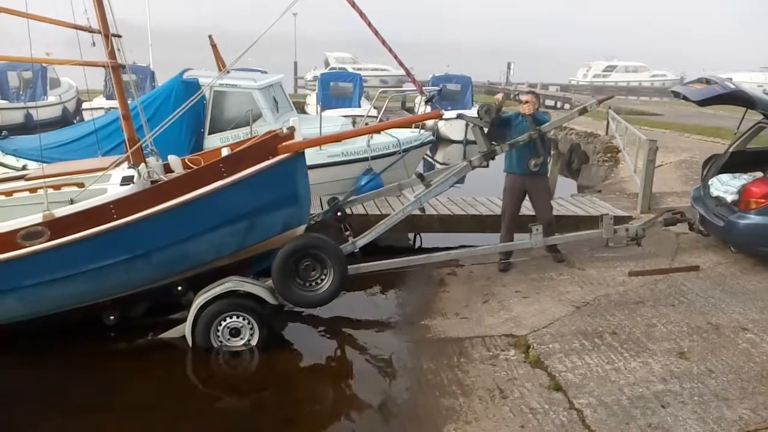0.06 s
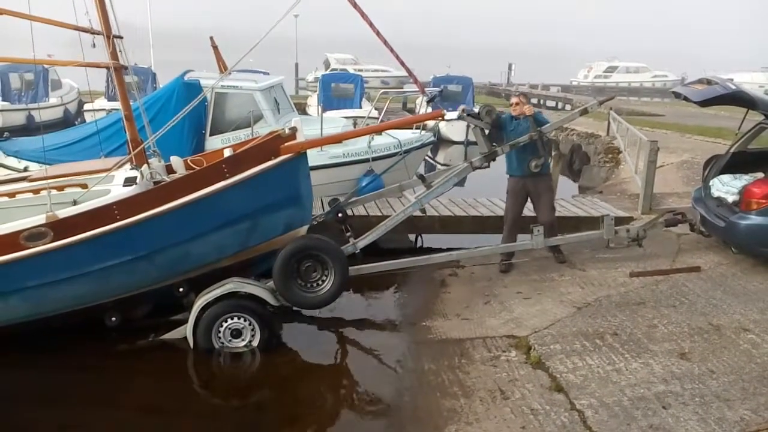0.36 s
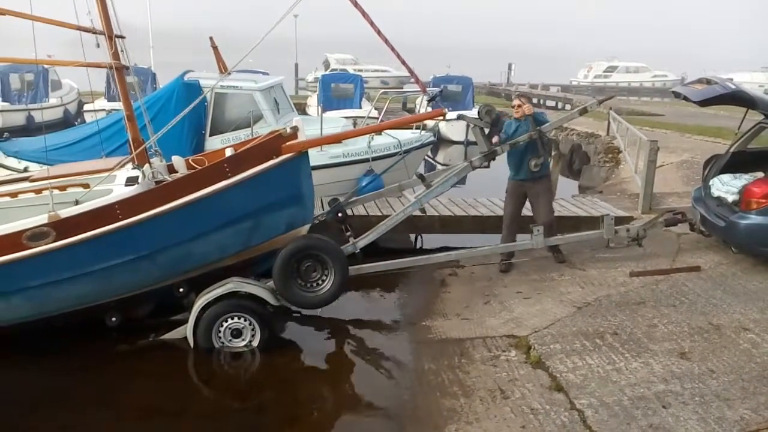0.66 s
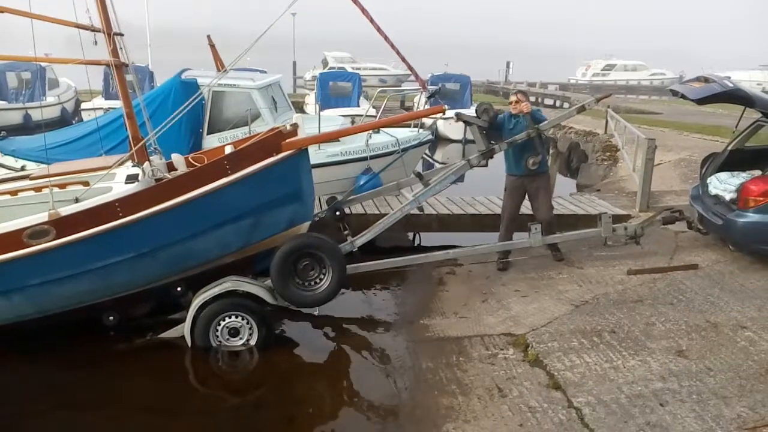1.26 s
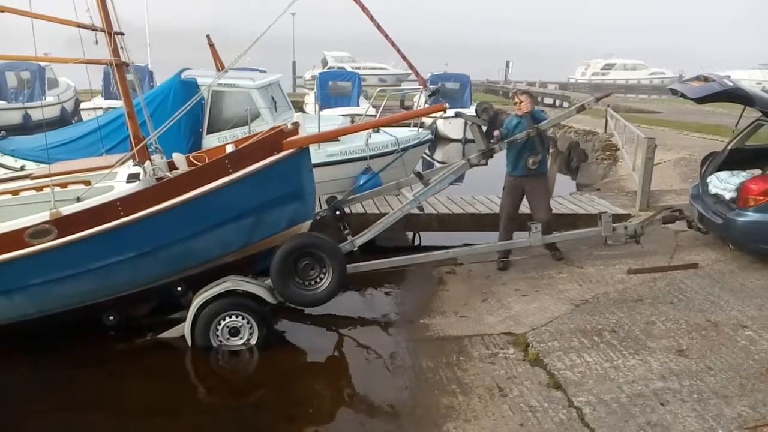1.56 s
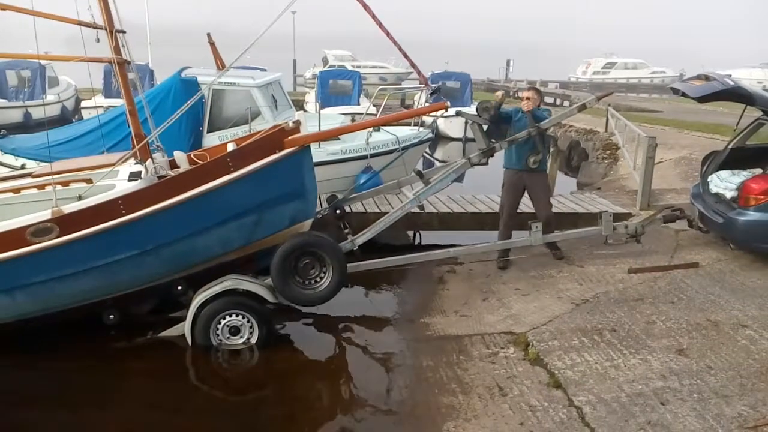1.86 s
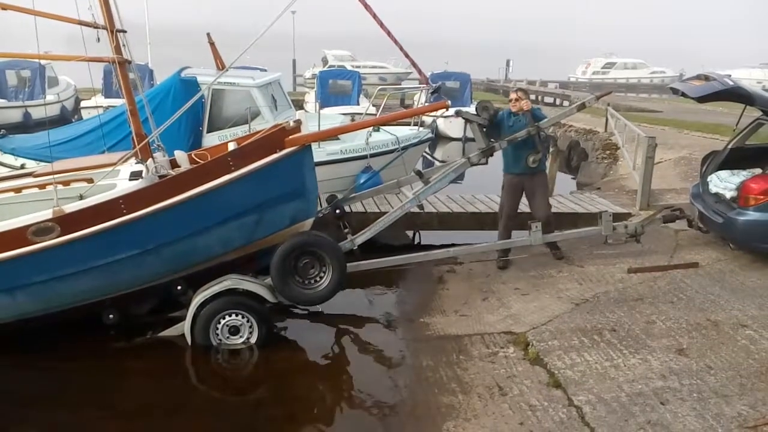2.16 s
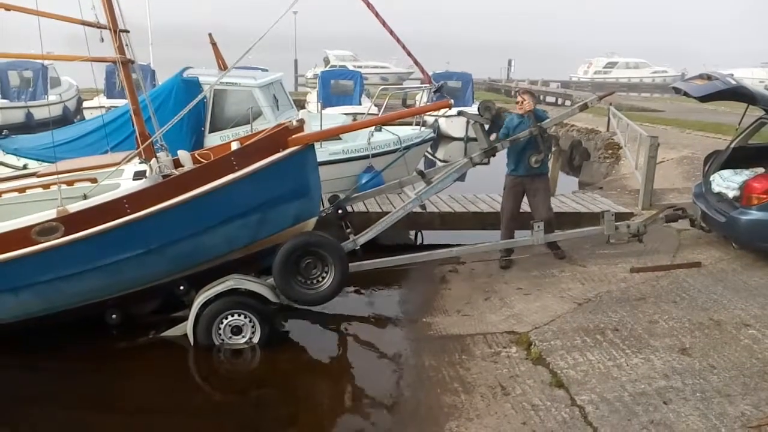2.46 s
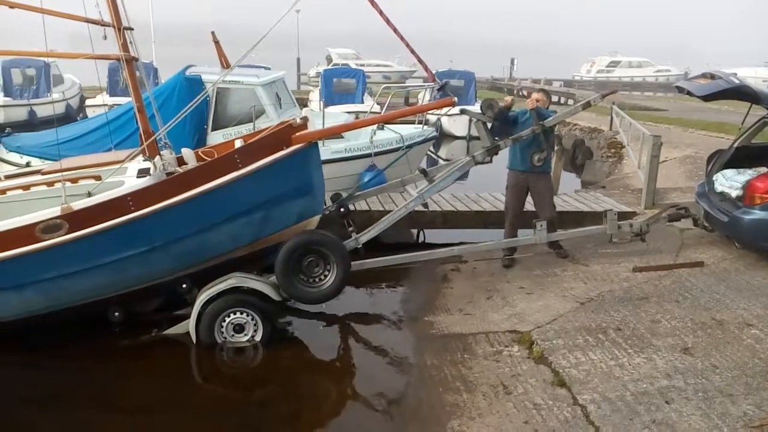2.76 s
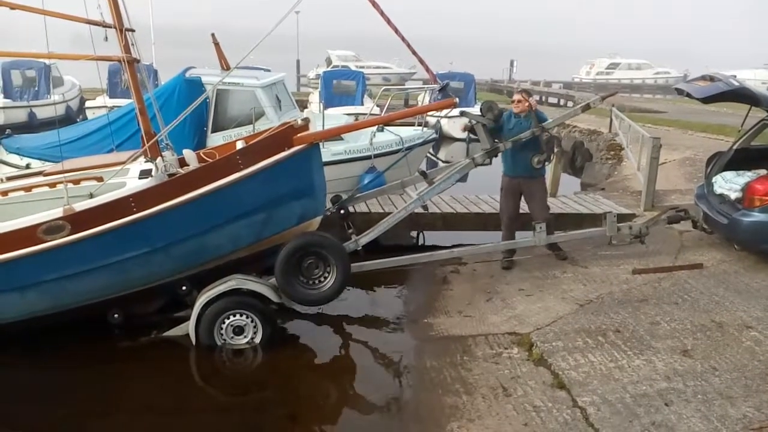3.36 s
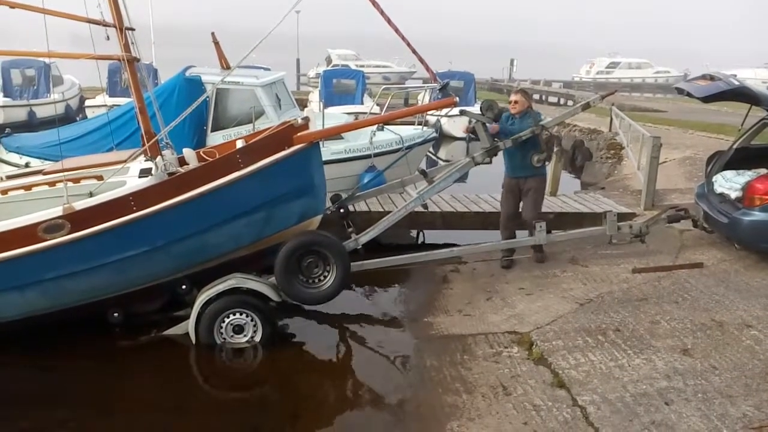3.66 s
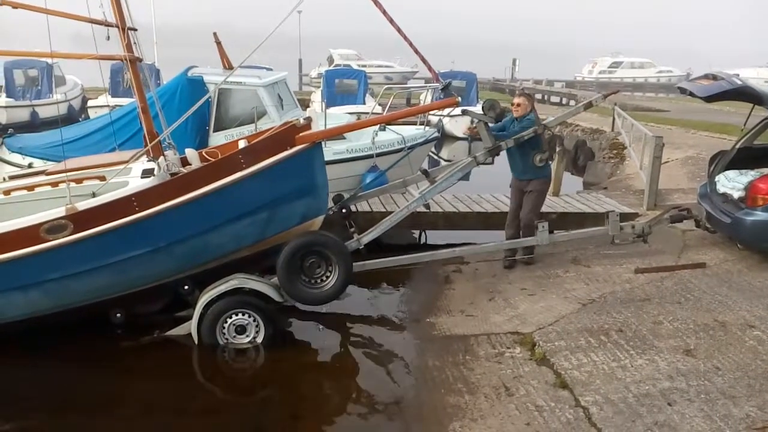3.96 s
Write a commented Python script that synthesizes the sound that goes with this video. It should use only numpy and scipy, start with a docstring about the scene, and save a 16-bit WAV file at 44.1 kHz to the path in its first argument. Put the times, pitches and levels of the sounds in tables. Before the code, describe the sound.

Bright steel ratchet clicks run quickly and unevenly from a hand-cranked trailer winch on an outdoor slipway. Faint grinding lies underneath and light wind brushes the microphone. A soft, dull knock comes shortly before the clicking slows and stops.

```python
"""An open slipway: a few metres away, a hand winch hauls a boat up its trailer.
The steel pawl clicks over the ratchet wheel, faster and slower with each turn of the crank, and stops
after a last slow tooth. Each click is a bright snap with the ring of pawl, housing and wheel, thrown
back by hulls and concrete. Underneath, gears grind, rollers rumble and the frame groans; the load
shifts with one dull knock, and a light wind brushes the microphone."""
import sys
import numpy as np
from scipy import signal
from scipy.fft import rfft, irfft
from scipy.io import wavfile
from scipy.ndimage import uniform_filter1d

SR = 44100
rng = np.random.default_rng(int(sys.argv[2]) if len(sys.argv) > 2 else 0)


def transcribe(u):
    """Save the signal u as a 16-bit wav file named by the first command-line argument.

    u: samples, shape (n,) or (channels, n), limited to [-1, 1]; the rate is SR.
    q: integer samples, one column per channel.
    """
    v = np.clip(np.atleast_2d(u).T, -1, 1)
    q = np.round(v * 32767).astype(np.int16)
    wavfile.write(sys.argv[1], SR, q)


N = 176400

# Steady harbour air. Each row: frequency in Hz, relative level in dB.
AIR_SPECTRUM = [(30, -19), (75, 11), (130, -7.5), (400, 1), (800, -8.5), (1600, -8), (2200, -13),
                (4800, -14), (5600, -6.5), (7500, -26), (15500, -23)]
# Low buffeting of the wind. Each row: frequency in Hz, relative level in dB.
WIND_SPECTRUM = [(20, 0), (50, -31), (75, 11.5), (100, 1), (160, 0.5), (450, -13), (700, -61)]
# Rise and fall of the gusts. Each row: time in seconds, level in dB.
GUST_LEVEL = [(0, -67), (.17, -61.5), (.33, -67.5), (.68, -67), (1, -70), (1.38, -60.5), (1.6, -59),
              (1.85, -73), (2.62, -67.5), (2.85, -74), (3, -68.5), (3.6, -74.5)]
# Grind of the gears. Each row: frequency in Hz, relative level in dB.
GEAR_SPECTRUM = [(480, -14), (800, -9), (1050, -1.5), (1250, -3), (3600, -3.5), (6000, -6.5), (12000, -49)]
# Rumble of the rollers under the hull. Each row: frequency in Hz, relative level in dB.
ROLLER_SPECTRUM = [(90, -5), (150, 1), (330, 3.5), (520, 1), (3000, -83)]
# Groans of the trailer frame. Each row: peak time in seconds, pitch in Hz, level in dB.
FRAME_GROANS = [(.19, 605, -65.5), (.73, 604, -63), (.8, 272, -66), (.96, 586, -69), (1.57, 627, -68.5),
                (1.91, 610, -72), (2.2, 390, -68.5), (2.731, 582, -66), (3.049, 615, -65.5)]
# Resonances of the knock. Each row: start in seconds, pitch in Hz, width in Hz, seconds to fade
# by 60 dB, level in dB.
KNOCK_BANDS = [(3.192, 644, 174, 0.53, -57.5), (3.192, 950, 300, 0.26, -58), (3.21, 229, 100, 0.18, -49.5)]
# Teeth passing under the pawl. Each row: start in seconds, relative level of the ping in dB.
TOOTH_CLICKS = [(0.038, -36), (0.1048, -32), (0.1646, -36.5), (0.2218, -34.5), (0.2764, -37),
                (0.326, -37.5), (0.369, -38.5), (0.406, -34.5), (0.4433, -30.5), (0.4771, -52),
                (0.508, -31), (0.5353, -31), (0.5626, -33), (0.5892, -35), (0.618, -29.5), (0.6456, -34),
                (0.675, -37), (0.7035, -32), (0.7329, -33), (0.762, -38), (0.7935, -36), (0.829, -32.5),
                (0.8685, -34.5), (0.908, -37), (0.9481, -33), (0.9989, -37.5), (1.0537, -35.5),
                (1.1003, -33), (1.14, -34.5), (1.1781, -32.5), (1.2138, -38), (1.2448, -35.5), (1.276, -38),
                (1.3084, -34), (1.3388, -33), (1.3674, -33), (1.394, -32), (1.4199, -33.5), (1.4498, -33.5),
                (1.4795, -35.5), (1.5089, -34), (1.5396, -34.5), (1.5709, -33.5), (1.6013, -34),
                (1.6324, -34), (1.6617, -34.5), (1.698, -33.5), (1.738, -35.5), (1.7756, -36),
                (1.8171, -36), (1.8787, -36), (1.941, -34), (1.987, -32), (2.0285, -36.5), (2.068, -36.5),
                (2.1038, -30), (2.1398, -33.5), (2.1712, -36), (2.2072, -37), (2.2388, -36), (2.2706, -36),
                (2.3022, -30.5), (2.3359, -36), (2.3696, -35.5), (2.404, -35.5), (2.4363, -35), (2.47, -32),
                (2.504, -38), (2.5386, -34), (2.574, -33), (2.6111, -32.5), (2.6544, -37.5),
                (2.6983, -38.5), (2.739, -37), (2.7801, -39), (2.8421, -42), (2.9033, -35.5), (2.9577, -37),
                (3.0065, -35.5), (3.059, -36.5), (3.1051, -34.5), (3.149, -35.5), (3.1949, -39),
                (3.2403, -40), (3.282, -47), (3.3222, -38), (3.3639, -35), (3.4136, -44), (3.4695, -40.5),
                (3.5665, -60)]
# The pawl slips off, chatters and lands within a click. Each row: delay in ms, relative level in dB.
PAWL_CONTACTS = [(.1, -5), (.8, -4.5), (1.9, -10.5), (3.3, -4.5), (4, -1.5), (5.7, -5.5), (7.2, -16.5)]
# Bright ping of the pawl. Each row: pitch in Hz, relative level in dB.
PAWL_MODES = [(5630, -19), (6110, -7), (6185, -15), (6575, -14), (6960, -66.5), (7470, -41), (8090, -35)]
# Ring of the housing. Each row: pitch in Hz, relative level in dB.
HOUSING_MODES = [(1050, -70), (1610, -59.5), (1730, -57), (2340, -58), (3020, -60), (3700, -58.5),
                 (3920, -59.5), (4450, -71.5), (5270, -62.5), (5800, -44.5), (5930, -54)]
# Clack of the ratchet wheel. Each row: pitch in Hz, relative level in dB.
WHEEL_MODES = [(1915, 1), (2030, -8)]
# Weight of that clack through the haul. Each row: time in seconds, relative level in dB.
WHEEL_LEVEL = [(0, -44.5), (.3, -46.5), (.38, -43), (.67, -45.5), (.85, -42), (1.03, -45.5), (1.15, -41.5),
               (1.42, -50.5), (2.4, -48.5), (3.13, -42.5), (3.45, -47.5), (3.57, -55)]
# Broad snap of steel on steel. Each row: frequency in Hz, relative level in dB.
SNAP_SPECTRUM = [(800, -17), (1400, -13), (2600, 2), (3250, -1.5), (5500, 12), (6300, 12.5), (6900, 7.5),
                 (7700, -4), (8600, -52), (10000, -24.5), (12000, -33.5)]
# High glints on top of the snap. Each row: centre in Hz, width in Hz, relative level in dB.
GLINT_BANDS = [(14100, 370, 4.5), (15700, 240, -12), (14000, 230, -12), (11240, 180, 14)]
# Strength of the glints through the haul. Each row: time in seconds, relative level in dB.
GLINT_LEVEL = [(0, -82), (.28, -84), (.42, -75), (1, -81), (1.35, -75), (1.85, -78), (3.15, -70),
               (3.57, -74)]

TYPICAL_TEETH_PER_S, TYPICAL_PING_DB = 25, -34
SNAP_FOLLOW, HOUSING_FOLLOW = 0.05, 0.32  # dB gained for each dB of extra ping
SCATTER_DB, SCATTER_RISE_S, SCATTER_T60_S, SCATTER_KEPT = 7, 0.0046, 0.031, 0.58
CLACK_DELAY_S, CLACK_RISE_S = 0.000775, 0.0024


def amp(db):
    """Decibels to gain."""
    return 10 ** (np.asarray(db) / 20)


def unit_rms(x):
    """Scales to an rms of 1."""
    return x / np.sqrt(np.mean(x ** 2) + 1e-20)


def unit_energy(x):
    """Scales to an energy of 1."""
    return x / (np.linalg.norm(x) + 1e-20)


def eq_curve(points, hz):
    """Gain of a spectrum table at these frequencies."""
    f, db = np.transpose(points)
    return amp(np.interp(np.log(hz + 1), np.log(f), db))


def fader(points, s):
    """Gain of a level curve at these times."""
    return amp(np.interp(s, *np.transpose(points)))


def peaks(bands, hz):
    """Gain of a set of resonances."""
    return sum(amp(db) / (1 + (2 * (hz - f) / width) ** 2) for f, width, db in bands)


def add(mix, start_s, sound):
    """Mixes a sound in at a time."""
    part = mix[max(round(start_s * SR), 0):][:len(sound)]
    part += sound[:len(part)]


def minimum_phase(gain):
    """Spectrum of a sharp-edged ring with this tone colour."""
    log = np.log(np.maximum(gain, 1e-5))
    mirrored = np.r_[log, log[-2:0:-1]]
    return np.exp(np.conj(signal.hilbert(mirrored)))[:len(gain)]


def noise(gain):
    """Coloured noise of rms 1."""
    return unit_rms(irfft(rfft(rng.standard_normal(N)) * gain, N))


def flutter(hz, depth_db, smooth_s=0.026):
    """Uneven gain of sticking and slipping."""
    wobble = noise(np.exp(-(hz * smooth_s) ** 2))
    return unit_rms(amp(depth_db * wobble))


def crank_speed(s):
    """Pace of the winch from the spacing of the clicks; 1 is its usual pace."""
    times = np.transpose(TOOTH_CLICKS)[0]
    return np.interp(s, times, 1 / np.gradient(times)) / TYPICAL_TEETH_PER_S


def air_and_wind(t, hz, air_db=-72.5):
    """Light, low gusts on the microphone over a steady bed of harbour air."""
    rolloff = 1 + (hz / WIND_SPECTRUM[-1][0]) ** 2
    gusts = fader(GUST_LEVEL, t) * noise(eq_curve(WIND_SPECTRUM, hz) / rolloff)
    return gusts + amp(air_db) * noise(eq_curve(AIR_SPECTRUM, hz))


def slipway_reflections(dry, predelay_s=0.0065, near_t60_s=0.11, far_t60_s=0.37, far_top_hz=7100):
    """Adds quick reflections from hulls and concrete, and a faint, duller far tail."""
    t = np.arange(SR // 2) / SR
    near, far = rng.standard_normal((2, len(t))) * (t > predelay_s)
    far = signal.sosfilt(signal.butter(2, far_top_hz, fs=SR, output="sos"), far)
    near = amp(-10.5) * unit_energy(near * amp(-60 * t / near_t60_s))
    far = amp(-22) * unit_energy(far * amp(-60 * t / far_t60_s))
    return dry + signal.fftconvolve(dry, near + far)[:N]


def frame_groans(t, hz, swell_s=0.11, width_hz=100):
    """The trailer frame groans in short swells of narrow-band noise."""
    groans = np.zeros(N)
    for peak_s, pitch, db in FRAME_GROANS:
        swell = np.exp(-((t - peak_s) / swell_s) ** 2)
        groans += amp(db) * swell * noise(peaks([(pitch, width_hz, 0)], hz))
    return groans * flutter(hz, depth_db=0.5)


def gears_and_rollers(t, hz, stop_s=0.093, rise_db_per_s=0.3):
    """Gears grind and rollers rumble, louder as the crank speeds up, dying after the last tooth."""
    since_last_tooth = np.maximum(t - TOOTH_CLICKS[-1][0], 0)
    speed = crank_speed(t) * np.exp(-since_last_tooth / stop_s)
    grind = amp(-62 + rise_db_per_s * t) * speed * noise(eq_curve(GEAR_SPECTRUM, hz))
    rumble = amp(-76) * speed ** 2.15 * noise(eq_curve(ROLLER_SPECTRUM, hz))
    return grind + rumble * flutter(hz, depth_db=6.5)


def load_knock(t, hz):
    """One dull, rough knock as the load shifts; each resonance swells over two cycles."""
    out = np.zeros(N)
    for start_s, pitch, width, t60, db in KNOCK_BANDS:
        attack = 1 - np.exp(-(t * pitch / 2) ** 2)
        add(out, start_s, attack * amp(db - 60 * t / t60) * noise(peaks([(pitch, width, 0)], hz)))
    return out


def frame_ring(clicks, pitch_hz=1747, t60_s=0.96, send_db=-33.5):
    """The trailer frame rings on faintly after the clicks."""
    t = np.arange(SR) / SR
    tone = unit_energy(np.sin(2 * np.pi * pitch_hz * t) * amp(-60 * t / t60_s))
    return amp(send_db) * signal.fftconvolve(clicks, tone)[:N]


def steel_ring(drive, hz, modes, width_hz, skirt_hz=626, detune=0.0043, spread_db=2.5):
    """Struck steel rings in its modes, their pitch and level a little different on every tooth."""
    out = 0
    for pitch, db in modes:
        offset = 2j * (hz - pitch * (1 + detune * rng.standard_normal()))
        mode = irfft(drive / (1 + offset / width_hz) / (1 + offset / skirt_hz))
        out = out + amp(db + spread_db * rng.standard_normal()) * unit_energy(mode)
    return out


def steel_snap(drive, hz, start_s, accent_db, glint_spread_db=2):
    """Steel hits steel: a broad snap, harder at speed, topped with flickering glints."""
    strength = amp(-41.5 + SNAP_FOLLOW * accent_db) * crank_speed(start_s) ** 0.36
    body = strength * unit_energy(eq_curve(SNAP_SPECTRUM, hz))
    bands = [(f, width, db + glint_spread_db * rng.standard_normal()) for f, width, db in GLINT_BANDS]
    glints = fader(GLINT_LEVEL, start_s) * unit_energy(peaks(bands, hz))
    colour = np.hypot(body, glints)
    snap = irfft(drive * minimum_phase(colour / colour.max()))
    return np.linalg.norm(colour) * unit_energy(snap)


def pawl_chatter(hz, drift_ms=0.083, jitter_ms=0.013, spread_db=5.5):
    """Yields each tooth's burst of contacts as a spectrum; timing drifts and force varies."""
    delay_ms, contact_db = np.transpose(PAWL_CONTACTS)
    drift, jitter, forces = rng.standard_normal((3, len(TOOTH_CLICKS), len(PAWL_CONTACTS)))
    drift = unit_rms(uniform_filter1d(drift, size=9, axis=0))  # smoothed over nine teeth
    delays_s = np.maximum(delay_ms + drift_ms * drift + jitter_ms * jitter, 0) / 1000
    for delay_s, force in zip(delays_s, forces):
        impulses = np.exp(-2j * np.pi * np.outer(delay_s, hz))
        yield unit_energy(amp(contact_db + spread_db * force)) @ impulses


def ratchet(click_samples=4096, energy_gain=560):
    """On each tooth the pawl's chatter snaps and rings pawl and housing; one blow clacks the wheel."""
    t, hz = np.arange(click_samples) / SR, np.fft.rfftfreq(click_samples, 1 / SR)
    out = np.zeros(N)
    scatter_envelope = (1 - np.exp(-(t / SCATTER_RISE_S) ** 2)) * amp(-60 * t / SCATTER_T60_S)
    clack_attack = 1 - np.exp(-(t / CLACK_RISE_S) ** 2)  # the wheel takes a few cycles to ring up
    grain = rng.standard_normal(len(t))
    for (start_s, ping_db), contacts in zip(TOOTH_CLICKS, pawl_chatter(hz)):
        # a short noisy tail thickens the snap and keeps part of its grain from tooth to tooth
        grain = np.sqrt(SCATTER_KEPT) * grain + np.sqrt(1 - SCATTER_KEPT) * rng.standard_normal(len(t))
        scatter = amp(SCATTER_DB) * rfft(unit_energy(grain * scatter_envelope))
        accent_db = ping_db - TYPICAL_PING_DB
        snap = steel_snap(contacts + scatter, hz, start_s, accent_db)
        ping = amp(ping_db) * steel_ring(contacts, hz, PAWL_MODES, width_hz=80)
        housing = amp(HOUSING_FOLLOW * accent_db) * steel_ring(contacts, hz, HOUSING_MODES, width_hz=71)
        clack = unit_energy(clack_attack * steel_ring(1, hz, WHEEL_MODES, width_hz=143))
        add(out, start_s, snap + ping + housing)
        add(out, start_s + CLACK_DELAY_S, fader(WHEEL_LEVEL, start_s) * clack)
    return np.sqrt(energy_gain) * out


def scene():
    """Mono mix: clicks and knock with their reflections, over murmuring machinery and wind."""
    t, hz = np.arange(N) / SR, np.fft.rfftfreq(N, 1 / SR)
    clicks = ratchet()
    foreground = slipway_reflections(clicks + load_knock(t, hz)) + frame_ring(clicks)
    bed = gears_and_rollers(t, hz) + frame_groans(t, hz) + air_and_wind(t, hz)
    return (foreground + bed)[None]


def record(dry):
    """A steep low-pass takes off the very top, above 15.6 kHz."""
    lowpass = signal.firwin(511, 15600, window=("kaiser", 9), fs=SR)
    return signal.oaconvolve(dry, lowpass[None], "same")


dry = scene()
out = record(dry)
transcribe(out)
```